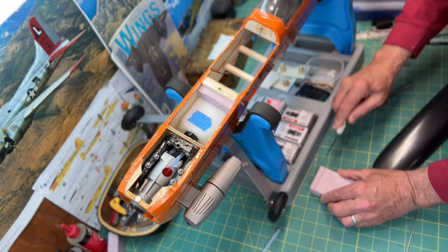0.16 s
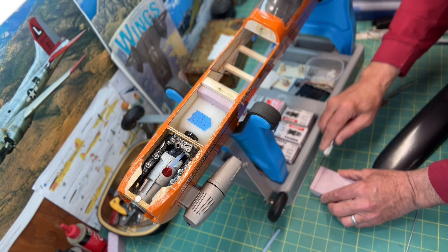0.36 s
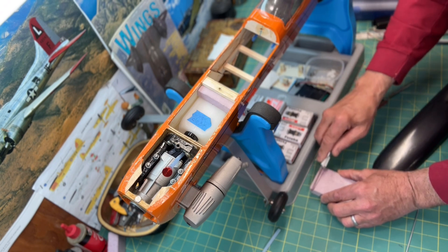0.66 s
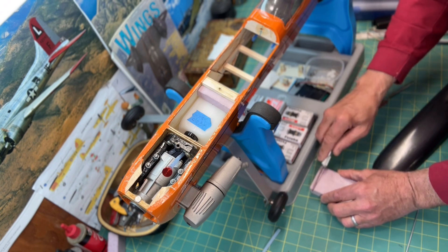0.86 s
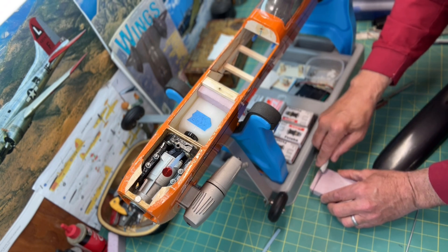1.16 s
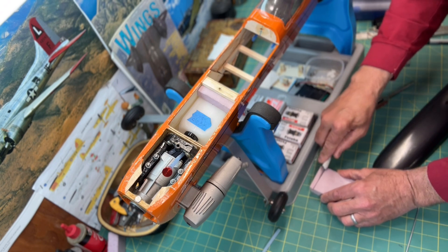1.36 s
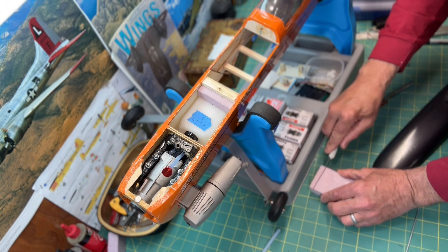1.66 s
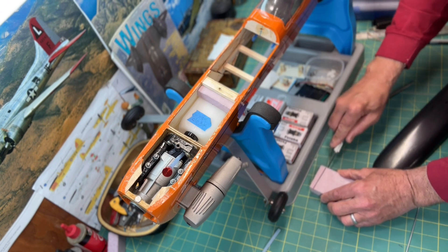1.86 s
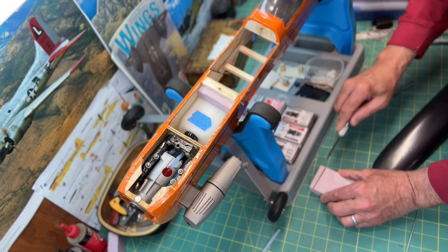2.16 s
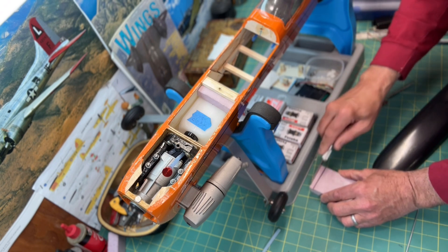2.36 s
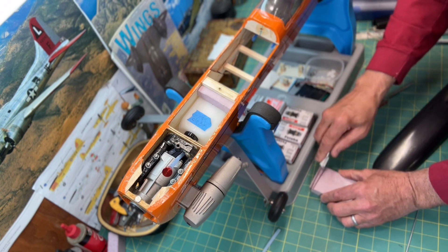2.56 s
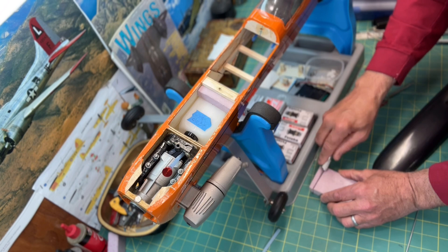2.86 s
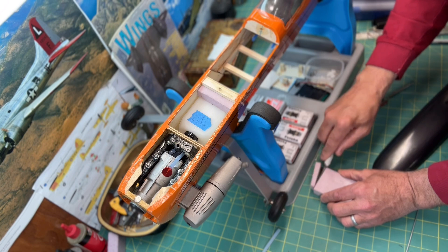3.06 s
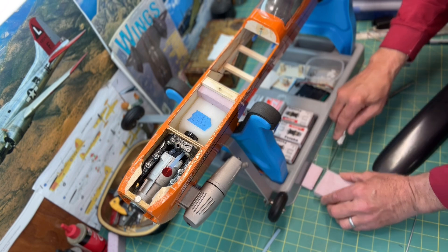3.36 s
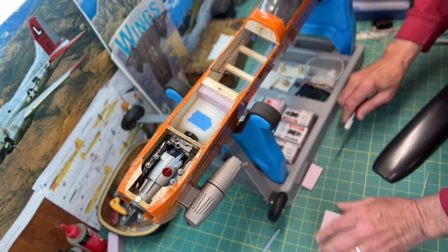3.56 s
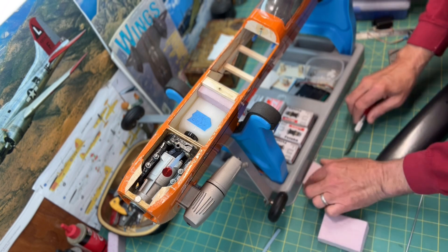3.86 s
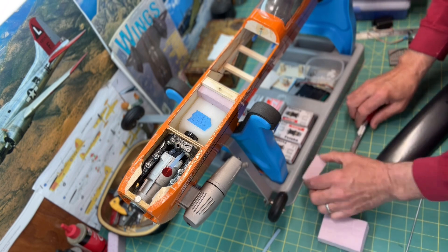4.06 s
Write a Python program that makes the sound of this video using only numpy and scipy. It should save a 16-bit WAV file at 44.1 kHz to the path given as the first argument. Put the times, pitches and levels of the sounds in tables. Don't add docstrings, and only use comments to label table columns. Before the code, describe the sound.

Close microphone in a quiet workshop with faint low rumble. A knock and small ticks, a pause, then a blade scores foam and saws with a steady hissing rasp. A very loud sharp snap lands near two seconds, then light scratches, a second loud snap, a brighter scrape as the offcut slides over the mat, and tools clicking down on the bench.

```python
import sys
import numpy as np
from scipy import signal
from scipy.fft import rfft, irfft
from scipy.io import wavfile
from scipy.ndimage import uniform_filter1d

SR = 44100
rng = np.random.default_rng(int(sys.argv[2]) if len(sys.argv) > 2 else 0)


def magnitude_from_level(level_db):
    exponent = np.asarray(level_db, float) / 20
    return 10 ** exponent


def waveform_to_disk(signal):
    frames = np.transpose(np.atleast_2d(signal))
    scaled = np.clip(frames, -1, 1) * 32767
    samples = np.round(scaled).astype(np.int16)
    wavfile.write(sys.argv[1], SR, samples)


N = 185175

# time [s], pressure [dB], depth in the foam [0-1].
LIGHT_STROKE = [(2.654, -97, .3), (2.672, -75, 0.36), (2.698, -63.5, 0.63), (2.722, -72.5, .2),
                (2.745, -66, .1), (2.79, -69.5, 0.45), (2.895, -60, 0.79), (2.912, -54, 0.56),
                (2.964, -75, 1)]


def evened(x):
    return x / np.sqrt(np.mean(x ** 2) + 1e-20)


def read(points, hz):
    f, value = np.transpose(points)
    return np.interp(np.log(hz + 1), np.log(f + 1), value)


def colour(x, points):
    gain = magnitude_from_level(read(points, np.fft.rfftfreq(len(x), 1 / SR)))
    return evened(irfft(rfft(x) * gain, len(x)))


def wander(size, span):
    return evened(uniform_filter1d(uniform_filter1d(rng.standard_normal(size), span), span))


def resonate(x, hz, width_hz):
    turn = np.exp(2j * np.pi * np.cumsum(hz * np.ones(len(x))) / SR)
    r = np.exp(-np.pi * width_hz / SR)
    return 2 * (turn * signal.lfilter([1 - r], [1, -r], x / turn + 1e-18)).real


def twice(x, hz, width_hz):
    return evened(resonate(resonate(x, hz, width_hz), hz, width_hz))


def add(mix, start_s, sound):
    part = mix[round(start_s * SR):][:len(sound)]
    part += sound[:len(part)]


def controls(rows):
    s, *columns = np.transpose(rows)
    at = np.arange(round(s[0] * SR), round(s[-1] * SR) + 330)
    rise = at - at[0] + 150 * (at[0] == 0)
    fade = np.clip(np.minimum(rise, at[-1] - at) / 150, 0, 1)
    return at, fade, [np.interp(at / SR, s, c) for c in columns]


def background():
    # frequency [Hz], density [dB per Hz].
    air_colour = [(40, -15.5), (70, -5), (95, -8.5), (128, -2), (170, -13.5), (300, -12), (420, -26),
                  (520, -12), (640, -27.5), (1000, -36), (2200, -40), (16000, -51)]
    rumble_colour = [(1.2, -18), (2.0, 0.5), (18, -0.5), (30, -26.5), (48, -19), (70, -22.5), (90, -37),
                     (120, -48), (200, -120)]
    # time [s], level [dB].
    lean = [(0, -52), (.24, -62.5), (.9, -63.5), (1.25, -57), (1.75, -58.5), (2.0, -58), (3.1, -55.5),
            (3.499, -57.5), (3.8, -51.5), (4.0, -49.5), (4.11, -49), (4.18, -41.5)]
    murmur_colour = [(30, -20.0), (60, -0.5), (300, -4), (700, -11), (2500, -34.5), (6000, -45.0)]
    lean_db = np.interp(np.arange(N) / SR, *np.transpose(lean))
    rock_db = 0.98 * np.maximum(lean_db + 52.5, 0)
    rumble_db = -35 + 2.35 * wander(N, 5000) + rock_db
    air, murmur, rumble = rng.standard_normal((3, N))
    out = magnitude_from_level(-57) * colour(air, air_colour)
    out += magnitude_from_level(lean_db - 3.0) * colour(murmur, murmur_colour)
    return out + magnitude_from_level(rumble_db) * colour(rumble, rumble_colour)


def room(x):
    # frequency [Hz], t60 [s].
    decay = [(300, 0.31), (1000, .3), (3000, 0.17), (8000, 0.182), (15000, 0.31)]
    taps = np.zeros(SR // 2)
    at = np.arange(130, len(taps) - 20, 20)
    taps[at + rng.integers(0, 20, len(at))] = rng.choice([-1., 1.], len(at))
    hz, t, z = signal.stft(taps, SR, nperseg=128)
    tail = signal.istft(z * magnitude_from_level(-60 * t / read(decay, hz)[:, None]), SR, nperseg=128)[1]
    return signal.fftconvolve(x, tail / np.linalg.norm(tail))[:N]


def thumps():
    # start [s], peak [dB], frequency [Hz], t60 [s].
    pushes = [
        (.021, -38, 131, 0.1),
        (0.778, -49, 60, 0.11),
        (3.051, -40, 65, 0.1),
        (4.064, -34, 45, 0.23),
        (4.133, -39, 150, 0.064),
        (4.167, -29.5, 48, .2),
    ]
    t, out = np.arange(9000) / SR, np.zeros(N)
    for s, db, hz, t60_s in pushes:
        swing = np.sin(2 * np.pi * hz * t) * np.minimum(1, t / 0.0047)
        add(out, s, magnitude_from_level(db - 60 * t / t60_s) * swing)
    return out


def knocks():
    # start [s], peak [dB], bench [Hz], block [Hz], block level [dB re peak].
    blows = [(0.021, -29, 434, 845, 2), (1.497, -51, 288, 767, -7), (1.9361, -31.5, 520, 970, 11.5),
             (2.069, -50, 278, 870, 2), (2.573, -44.5, 501, 1510, 7), (3.048, -43, 466, 1120, -3),
             (3.22, -48.5, 287, 885, 1), (3.281, -39.5, 280, 1210, 7), (3.8907, -32, 423, 1250, 3),
             (4.1313, -29.5, 340, 1320, 1), (4.145, -33, 441, 900, -1), (4.163, -45, 460, 754, 0),
             (4.192, -42, 250, 800, -1)]
    t, out = np.arange(8820) / SR, np.zeros(N)
    f = np.fft.rfftfreq(len(t), 1 / SR)
    for i, (s, db, bench_hz, block_hz, block_db) in enumerate(blows):
        t60_s = 0.082 if i == 0 else 0.054
        bench = np.exp(-(np.log((f + 1) / bench_hz) / .65) ** 2)
        block = np.exp(-(np.log((f + 1) / block_hz) / .3) ** 2)
        shape = bench + magnitude_from_level(block_db - 5.5) * block
        shake = evened(irfft(rfft(rng.standard_normal(len(t))) * shape, len(t)))
        fall = magnitude_from_level(-60 * t / t60_s) + magnitude_from_level(-18.5 - 60 * t / 0.24)
        add(out, s + .0012, magnitude_from_level(db) * shake * fall * np.minimum(1, t / 0.00083))
    return out


def rings():
    # start [s], frequency [Hz], peak [dB], t60 [s].
    modes = [(0.097, 3210, -49.5, 0.053), (.099, 14000, -58, .02), (.099, 9300, -63, .02),
             (1.937, 1055, -20.5, 0.021), (1.945, 1059, -40.5, 0.11), (2.076, 5770, -55, 0.041),
             (2.529, 6520, -61, .035), (2.5755, 2090, -36.5, 0.038), (2.5755, 4880, -44.5, .04),
             (2.885, 1650, -61, 0.14), (2.908, 1656, -57, 0.11), (3.826, 1750, -54, .04)]
    t, out = np.arange(4000) / SR, np.zeros(N)
    for s, hz, db, t60_s in modes:
        pair = np.sin(2 * np.pi * hz * t) + 0.33 * np.sin(2 * np.pi * (hz + 70) * t)
        add(out, s, magnitude_from_level(db - 60 * t / t60_s) * pair * np.minimum(1, t / 0.00047))
    return out


def snaps(rows, top_db, t60_s):
    t, out = np.arange(11025) / SR, np.zeros(N)
    f = np.fft.rfftfreq(len(t), 1 / SR)
    for s, db, hz, low_db in rows:
        high_db = low_db + top_db
        skirt = [(700, low_db - 30.5), (1600, low_db + 3), (3200, low_db + 1.5),
                 (10500, high_db), (13000, high_db - 10), (17000, high_db - 5)]
        shape = magnitude_from_level(read(skirt, f)) + np.exp(-(np.log((f + 1) / hz) / 0.24) ** 2)
        crack = evened(irfft(rfft(rng.standard_normal(len(t))) * shape, len(t)))
        dull = irfft(rfft(crack) / (1 + (f / 7000) ** 2), len(t))
        body = crack * (magnitude_from_level(-60 * t / t60_s) + magnitude_from_level(-24 - 60 * t / 0.14))
        body += dull * magnitude_from_level(-32.5 - 60 * t / 0.26)
        add(out, s, magnitude_from_level(db - 7.5) * body * np.minimum(1, t / 0.00016))
    return out


def clicks():
    # start [s], peak [dB], ring [Hz], skirt [dB re peak].
    cracks = [(0.0974, -48, 3250, 4), (1.17, -47, 7450, -12), (1.4979, -22, 7100, -7),
              (1.9375, -4, 5070, -5), (2.574, -27, 4230, -10), (2.9053, -43, 7340, -1),
              (3.049, -9, 7900, 1), (3.223, -35, 3800, -1), (3.3379, -39, 5040, -15),
              (3.8705, -21, 6460, -19.5), (3.8745, -19.5, 6600, -36), (3.886, -29, 6900, -21)]
    ticks = [(0.0215, -20, 3000, -2), (0.0915, -37.5, 5460, -11), (0.0945, -29.5, 2370, -1),
             (2.0662, -40, 2960, 1), (2.0754, -43, 5600, -6), (2.5027, -41, 2410, -31),
             (2.5257, -43, 6700, -3), (3.2837, -30.5, 6900, 0), (3.8214, -38, 4020, -10),
             (4.1086, -42, 4120, -4), (4.1325, -21, 4200, 1), (4.1655, -20.5, 4100, -11),
             (4.1924, -21.5, 4150, -10)]
    return snaps(cracks, top_db=4, t60_s=0.012) + snaps(ticks, top_db=-15.5, t60_s=0.013)


def singing():
    # frequency [Hz], width
    # [Hz], level [dB].
    squeak = [(2290, 520, 4.5), (5070, 420, 0.5), (7850, 750, 1.5), (9830, 480, -6.5), (12400, 910, 1.5),
              (14200, 740, 0)]
    out = np.zeros(N)
    at, fade, (db, depth) = controls(LIGHT_STROKE)
    low_db = np.interp(depth, [0, 1], (-22, 4.5))
    for k, (hz, width_hz, mode_db) in enumerate(squeak):
        waver = 1 + .008 * wander(len(at), 900)
        mode = twice(rng.standard_normal(len(at)), hz * waver, width_hz)
        level_db = db - 5.5 + mode_db + 5.2 * wander(len(at), 700)
        level_db = level_db + low_db * (k == 0) - 9 * (k > 3)
        out[at] += mode * magnitude_from_level(level_db) * fade
    return out


def tearing():
    level_db = 1.0 * wander(N, 20) + 0.48 * wander(N, 300)
    cells = rng.standard_normal(N) * magnitude_from_level(level_db)
    z = signal.stft(cells, nperseg=256, noverlap=192)[2]
    patches = uniform_filter1d(uniform_filter1d(rng.standard_normal(z.shape), 2, 0), 55, 1)
    return signal.istft(z * magnitude_from_level(1.7 * evened(patches)), nperseg=256, noverlap=192)[1][:N]


def brush(start_s, rise_s, hold_s, db, depth):
    lift_db, let_go_db_per_s = -30, 899.5
    end_s = start_s + rise_s + hold_s
    return [(start_s, db + lift_db * (start_s > 0), depth), (start_s + rise_s, db, depth),
            (end_s, db, depth), (end_s - lift_db / let_go_db_per_s, db + lift_db, depth)]


def streak(cells, hz, hz_share, span, width_hz, db):
    level = magnitude_from_level(db + 3 * wander(len(cells), 1200))
    return level * twice(cells, hz * (1 + hz_share * wander(len(cells), span)), width_hz)


def strokes():
    # frequency [Hz], density [dB per Hz].
    score = [(1470, -47), (2500, -20), (3780, -7), (4290, -5.5), (5970, -4.5), (6460, -16), (7320, -0.5),
             (8460, -6), (10500, -11), (13600, -39), (22000, -120)]
    saw = [(1470, -41), (2500, -22.5), (2990, 3.5), (3240, -4), (3420, 5), (4450, 6), (5560, -1.5),
           (7240, 5.5), (9770, 2), (10500, -7.5), (13600, -45.5), (22000, -120)]
    slide = [(1470, -3.5), (2500, -8), (2990, -3), (4810, 6), (5230, -6), (5900, -23), (6810, 1), (8560, 5),
             (10500, -8), (13600, -22), (22000, -120)]
    rub = [(1200, -9), (2500, -9), (4200, -16.5), (6000, -16), (10500, -25), (13000, -44)]
    boom_colour = [(350, -12.5), (600, -19), (951, -11.5), (1150, -4.5), (1470, -9), (1630, -6), (2600, 1),
                   (3380, -15.5), (5720, -120)]
    fizz_colour = [(8000, -16), (10000, -8), (11500, 0.5), (13000, 0), (14500, 2), (16000, -3),
                   (17000, -29)]
    # time [s], pressure [dB], depth or weight on the mat [0-1].
    first_score = [(.9, -84, .6), (.914, -56.5, 0.9), (.945, -50.5, 0), (1.07, -40.5, 0.46),
                   (1.105, -44, .55), (1.165, -67.5, 0.85), (1.213, -58.5, .6)]
    long_cut = [(1.218, -48, .3), (1.228, -44.5, 0.2), (1.3, -45, 0.82), (1.386, -50, 1),
                (1.49, -45.5, 0.93), (1.57, -46.5, 0.59), (1.7, -46.5, 0.78), (1.82, -50.5, 0.79),
                (1.93, -51.5, 0.74)]
    last_cut = [(2.97, -71, .3), (3.014, -52, 0.17), (3.045, -54.5, 0.37), (3.065, -49, 0.96),
                (3.125, -50, 1), (3.17, -58, 0.46), (3.225, -54.5, 0.27), (3.285, -54, 0.21),
                (3.32, -63.5, .3)]
    push = [(3.335, -62.5, 0.84), (3.371, -41, 0.86), (3.447, -39.5, 0.67), (3.505, -39.5, 0.26),
            (3.528, -44, 0.38), (3.56, -69, 0.82), (3.6, -84, 0.3)]
    # start [s], rise [s], hold [s], pressure [dB], depth [0-1].
    brushes = [
        (0, .004, 0.019, -44.5, 0.88),
        (0.688, 0.011, 0.088, -59, 0.79),
        (2.031, 0.026, 0.011, -63.5, 1),
        (3.885, 0.0069, 0.0026, -50, 0.94),
        (4.005, 0.048, 0.045, -60.5, 0),
    ]
    # value when shallow, value when deep; rows are boom [dB], fizz [dB],
    # contact [Hz], contact [dB], streak [Hz], streak [dB], levels re pressure.
    bite = [(-19, -6), (-9, -5.5), (8205.5, 4999.5), (1, -18), (3497, 2899.5), (-31.5, -9)]
    through = [(-13, -11), (-1.5, -4), (7602, 3997.5), (-11, -9), (2902, 3200), (-26, -24)]
    skid = [(-28, 1), (-11, -11.5), (5350, 5952), (3.5, -5), (2600, 2034), (-34, -1)]
    skim = [(-40, -1), (-10, -12.5), (7514, 6504), (3, -18), (3400, 2900), (-45, -5)]
    touch = [(-7, -1), (-27, -4), (4300, 4600), (-8, -3), (2503, 3005), (-36, 1)]

    drag = [(s, db - 1.5, depth) for s, db, depth in LIGHT_STROKE]
    moves = [(first_score, score, skim), (long_cut, saw, bite), (drag, saw, through),
             (last_cut, saw, through), (push, slide, skid)]
    moves += zip([brush(*row) for row in brushes], [saw, score, slide, score, rub],
                 [touch, skim, skid, skim, touch])
    cells, out = tearing(), np.zeros(N)
    boom, fizz = colour(cells, boom_colour), colour(cells, fizz_colour)
    for rows, kind, law in moves:
        at, fade, (db, depth) = controls(rows)
        bent = [a + (b - a) * np.clip(depth, 0, 1) for a, b in law]
        boom_db, fizz_db, contact_hz, contact_db, streak_hz, streak_db = bent
        sound = colour(cells[at], kind)
        sound += magnitude_from_level(boom_db) * boom[at] + magnitude_from_level(fizz_db) * fizz[at]
        sound += magnitude_from_level(contact_db) * twice(cells[at], contact_hz, 1700)
        sound += streak(cells[at], streak_hz, .02, 1500, 330, streak_db)
        sound += streak(cells[at], 4720, .025, 1500, 420, -21)
        out[at] += magnitude_from_level(db - 2.5) * sound * fade
    return out


def scene():
    friction = strokes() + singing()
    blows = clicks() + rings() + knocks() + thumps()
    return (background() + room(magnitude_from_level(-13.5) * friction) + blows + friction)[None]


def top_cut(x):
    return signal.sosfilt(signal.butter(12, 16480, fs=SR, output="sos"), x)


def record(dry):
    edge_hz = 15830
    mirrored = np.hstack([dry, dry[:, ::-1]])
    f = np.fft.rfftfreq(2 * N, 1 / SR)
    shelf = magnitude_from_level(np.interp(f, [edge_hz - 120, edge_hz + 120], [0, -32]))
    return top_cut(irfft(rfft(mirrored) * shelf, 2 * N)[:, :N])


dry = scene()
out = record(dry)
waveform_to_disk(out)
```